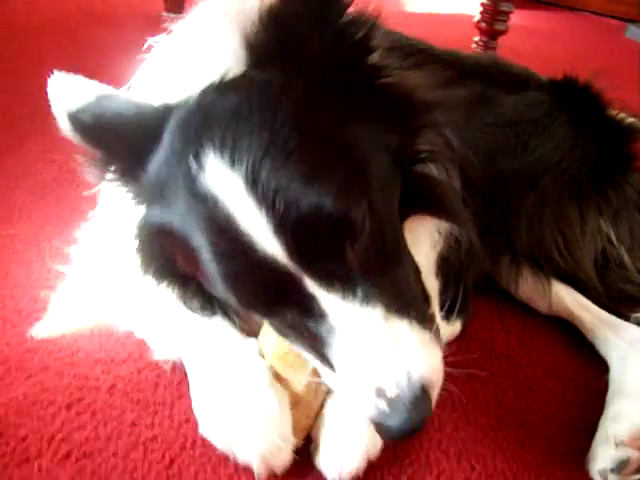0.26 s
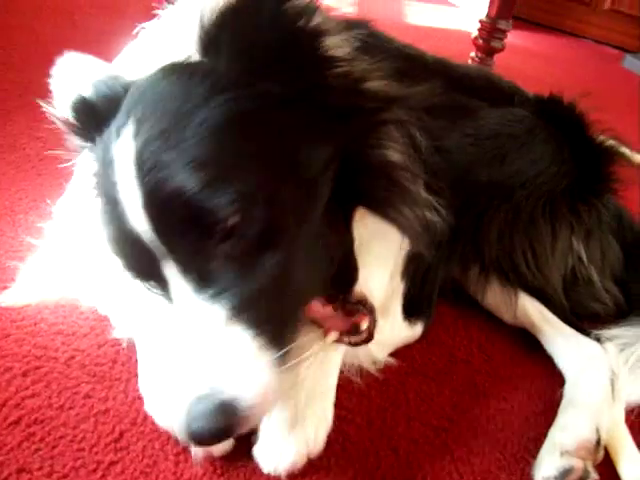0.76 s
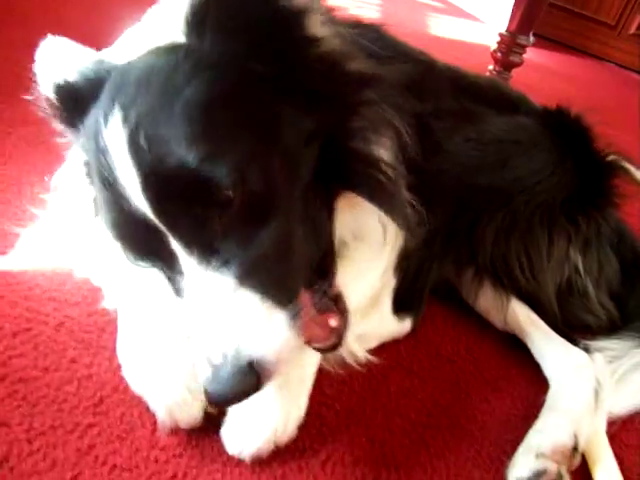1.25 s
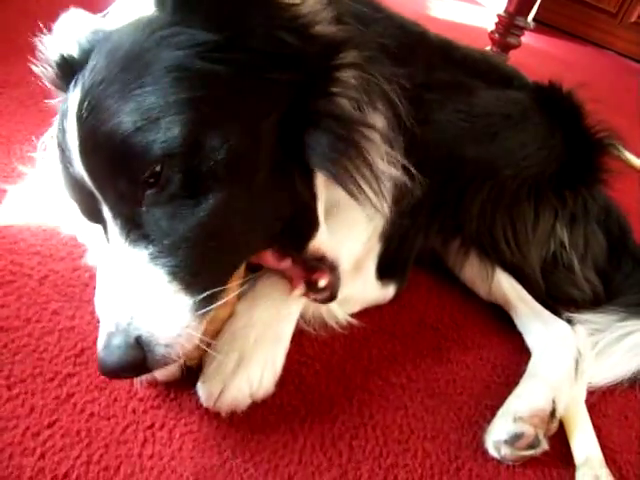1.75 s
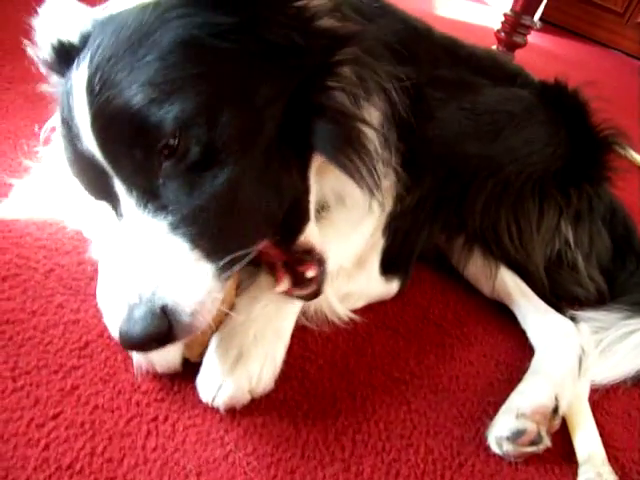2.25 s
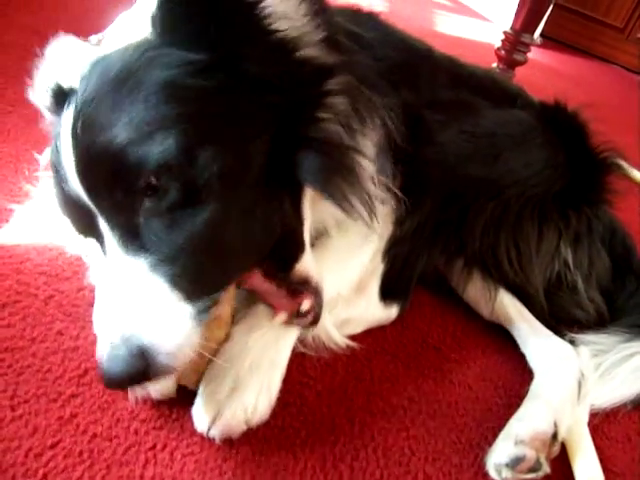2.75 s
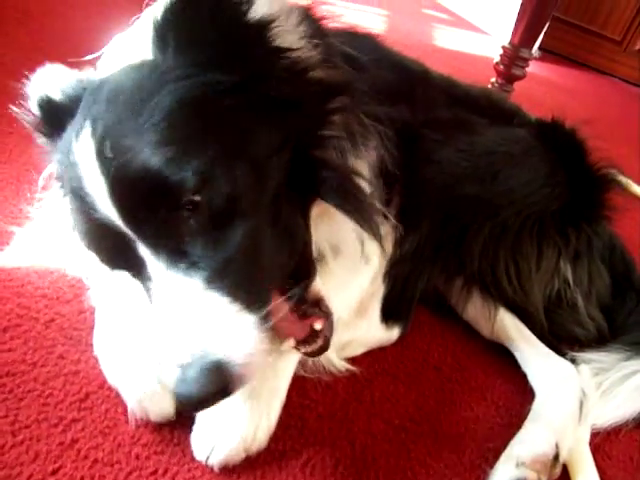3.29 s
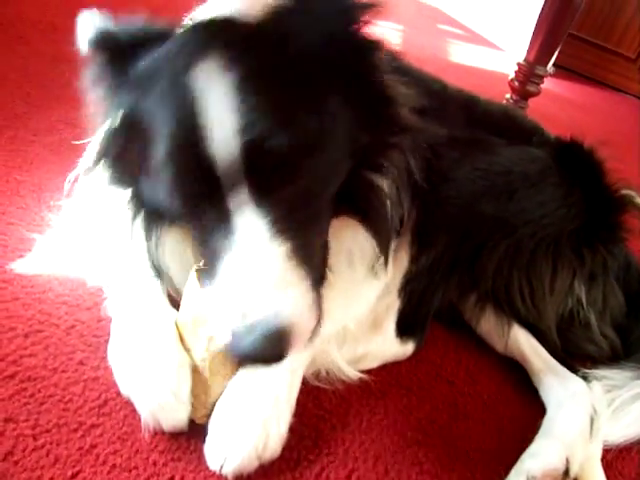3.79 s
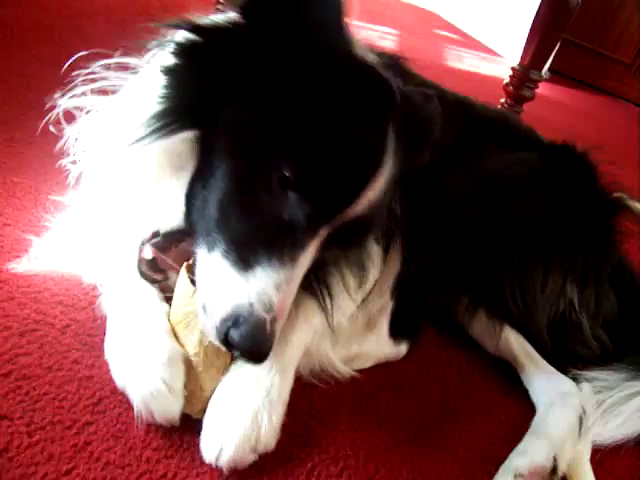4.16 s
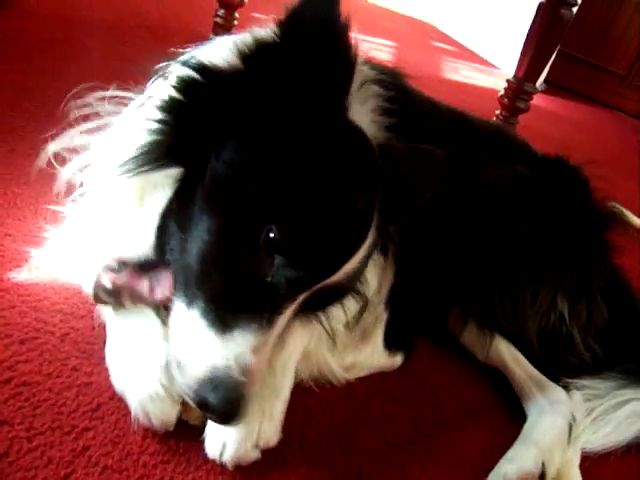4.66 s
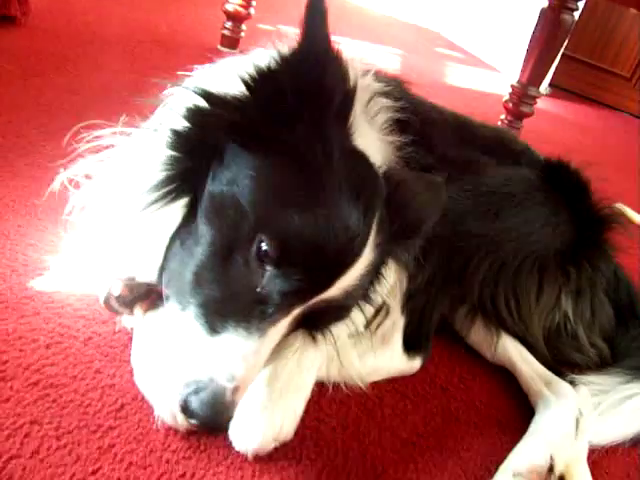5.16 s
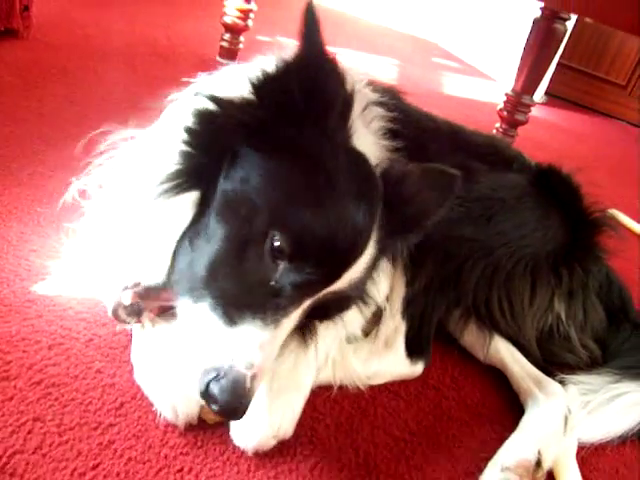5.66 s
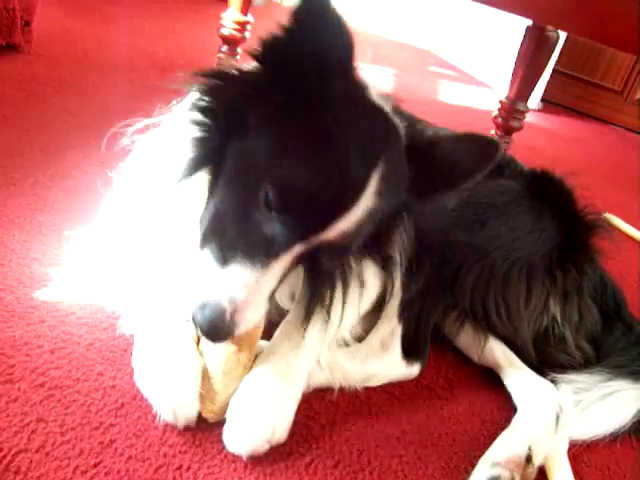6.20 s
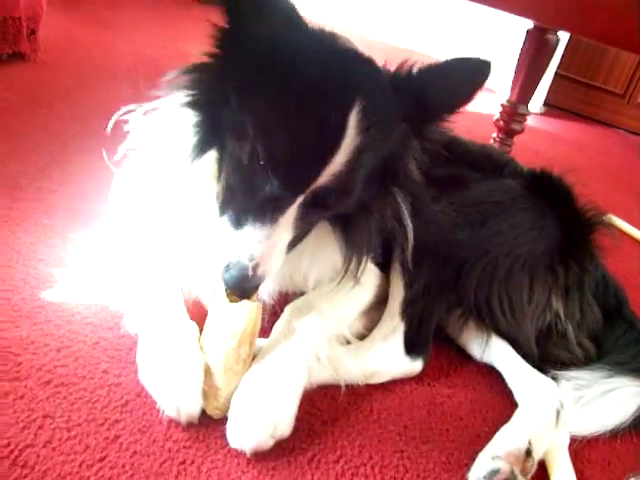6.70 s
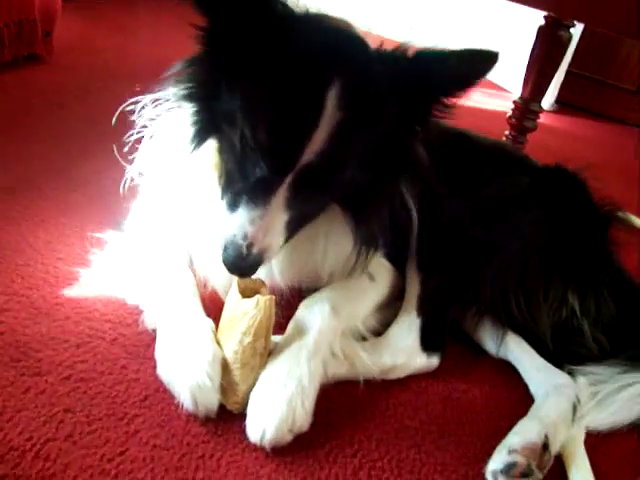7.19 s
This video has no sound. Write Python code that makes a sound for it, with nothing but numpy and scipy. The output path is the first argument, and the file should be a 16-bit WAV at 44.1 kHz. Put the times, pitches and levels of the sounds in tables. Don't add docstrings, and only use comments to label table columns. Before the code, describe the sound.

Close to a small camera in a carpeted room, a dog chews a hard bone. Bright tooth cracks and dull, short hollow knocks come in irregular clusters, with brief scrapes and tiny ticks between. The hardest bites fall around three and a half and five and a half seconds. Then it quiets to hum and hiss, a soft far door thud, a faint wet smack, and one last sharp crack with a damped tag clink.

```python
import sys
import numpy as np
from scipy import signal
from scipy.fft import rfft, irfft
from scipy.io import wavfile
from scipy.ndimage import uniform_filter1d

SR = 44100
rng = np.random.default_rng(int(sys.argv[2]) if len(sys.argv) > 2 else 0)


def put_to_file(sound):
    columns = np.atleast_2d(sound).T
    safe = np.clip(columns, -1, 1)
    whole_steps = np.round(safe * 32767)
    wavfile.write(sys.argv[1], SR, whole_steps.astype(np.int16))


def to_linear_factor(level_db):
    exponent = np.asarray(level_db, float) / 20
    return 10 ** exponent


N = 328104

# start_s, whine_db, hum_db
CAMERA_GAIN = [(0, -73.5, -74.5), (1.8, -76.5, -60), (2.3, -70, -52.5), (3.5, -68, -49.5),
               (5.7, -63.5, -46), (5.9, -75.5, -56), (7.44, -76, -48.5)]
# pitch_hz, level_db
MICROPHONE = [(1500, -1.5), (3300, 2.5), (5300, 1), (6800, 3.5), (7500, 1.5), (8000, -8), (8900, -5.5),
              (9700, -20), (10300, -52)]
# start_s, level_db, ring_share (of the free ring time)
TAG_HITS = [
    (.294, -39, 1),
    (0.326, -36.5, 1),
    (7.402, -24.5, 0.25),
    (7.429, -40, 0.6),
]
HOLLOW_HZ = 750


def evened(x):
    return x / np.sqrt(np.mean(x ** 2) + 1e-20)


def read(points, hz):
    f, value = np.transpose(points)
    return np.interp(np.log(hz + 1), np.log(f + 1), value)


def curve(rows, axis):
    return np.interp(np.arange(N) / SR, *np.transpose(rows)[[0, axis]])


def add(mix, s, sound):
    part = mix[round(s * SR):][:len(sound)]
    part += sound[:len(part)]


def resonate(x, hz, width):
    return signal.lfilter(*signal.iirpeak(hz, hz / width, SR), x)


def colour(x, points):
    log_gain = np.log(to_linear_factor(read(points, abs(np.fft.fftfreq(4096, 1 / SR)))))
    taps = np.fft.ifft(np.exp(np.conj(signal.hilbert(log_gain)))).real[:2048]
    return signal.oaconvolve(x, taps)[:len(x)]


def drift(per_s):
    return evened(signal.lfilter(*signal.butter(2, per_s, fs=SR), rng.standard_normal(N)))


def dying(t60s, levels):
    hz, t, z = signal.stft(rng.standard_normal(SR // 2), SR, nperseg=256)
    fade_db = read(levels, hz)[:, None] - 60 * t / read(t60s, hz)[:, None]
    return signal.istft(z * to_linear_factor(fade_db), SR, nperseg=256)[1]


def cracks():
    # start_s, peak_db, length_ms, body_db
    enamel_snaps = [(.1001, -16, 2.1, -17.5), (.1103, -28.5, 2.6, -24), (.2609, -18.5, 3.2, -13),
                    (.2937, -1, 1.5, -12), (.3711, -39, 1.2, -9.5), (1.0739, -37, 3, -9.5),
                    (1.5412, -35, 2.64, -38), (1.7114, -45.5, .43, -24.5), (2.5506, -39, 3.5, -24),
                    (2.8028, -24.5, 3.1, -15), (3.0122, -13, 0.86, -23.5), (3.0215, -37, 5.6, -12),
                    (3.2663, -14.5, 2.7, -7.5), (3.8568, -35.5, 0.29, -27), (3.9348, -17.5, 1.17, -13.5),
                    (3.9461, -23, 1.5, -19), (3.9687, -25, 1.6, -5), (4.0837, -15, 2.6, -51),
                    (4.094, -31, 3, -32), (4.1015, -35, 1.6, -11), (4.11, -32, 2.9, -15),
                    (5.5431, -19, 3.2, -12), (5.555, -15, 1.3, -12), (5.6854, -6, 1.8, -18),
                    (7.4005, -7, 1.8, -10), (4.5043, -29, 1.5, -2), (3.883, -46, .8, -25)]
    # start_s, peak_db, length_ms
    whole_crunches = [(.194, -18.5, 3), (.2517, -34, 2.2), (.2902, -15, 5), (.3206, -28.5, 2.8),
                      (.6342, -41.5, 3), (.8724, -31, 2.2), (.9043, -38.5, 2.3), (1.139, -35.5, 4),
                      (1.201, -39, 2.6), (1.2089, -25.5, 4.2), (1.261, -43, 8.2), (1.367, -49, 1.5),
                      (1.5198, -31.5, 0.56), (2.0134, -35.5, 2.5), (2.0741, -44, 1), (2.9366, -34, 8.5),
                      (3.2337, -22, 0.98), (3.2776, -43, 4.4), (3.3273, -24, 3.4), (3.3962, -24.5, 6.1),
                      (3.4015, -28, 4.4), (3.4139, -20.5, 2.1), (3.451, -10.5, 1.1), (3.8376, -56, 2.6),
                      (3.9744, -35, 3.8), (3.981, -38.5, 4.5), (3.9894, -41, 3.1), (3.9974, -23, 2.9),
                      (2.632, -50.5, 1.1), (7.4278, -33.5, 3.3)]
    # start_s, peak_db, length_ms, body_db, pitch_hz
    flakes = [(.4578, -37, 2.2, -9, 4150), (.8838, -39, 1.5, -20, 6800), (1.0666, -39.5, 6.5, -12, 3420),
              (1.2641, -37, 1.8, 2.5, 3670), (1.837, -46.5, 1, 6, 2500), (2.0089, -28, 2.3, -4, 3520),
              (2.3958, -38, 2.8, 0.5, 3200), (2.5573, -37, 1.6, -5, 3570), (2.8209, -26.5, 1.2, -20, 3250),
              (2.8839, -30.5, 1.6, -0.5, 3600), (2.9446, -18, 2.2, -1.5, 3380),
              (3.2226, -30.5, 2.5, -9, 4120), (3.4086, -23, 1.3, -18, 3600), (3.4429, -21, 3, -28, 3820),
              (3.642, -27.5, 0.89, -12, 3470), (4.8356, -44, 4, 0, 3350), (4.8557, -26, 0.33, -2.5, 3200),
              (5.282, -19.5, 2.1, -14, 3320), (5.3893, -32.5, 1.167, -10, 3220),
              (5.6723, -23, 4, -14, 3040), (5.6842, -8, 3, -28, 3020), (5.7857, -22.5, 1.4, 1, 3820),
              (6.0279, -43.5, 2.1, -30, 3490), (6.0435, -41, 3, -5, 3430), (6.8992, -46, 4, -25, 2800),
              (2.26, -48.5, 2.5, 0, 2670)]
    # start_s, peak_db, length_ms, body_db
    splinters = [(.2842, -32, 4.4, 4), (.5275, -35, 1.4, -12), (.5363, -44.5, 6.3, -2),
                 (2.0426, -40, 3.9, -24), (2.4671, -22, 1.9, -9), (4.5738, -32, 7.5, -1.5),
                 (4.7381, -33, 3.9, -26), (5.3143, -29.5, 3.4, -6.5), (5.7756, -4, 3.3, -15),
                 (5.7948, -27.5, 6, -3), (5.94, -50, 2.2, -9), (6.1067, -47, 2.7, -15),
                 (6.1188, -43.5, 2.9, -2), (6.1453, -46, 0.56, 1.5), (6.3919, -46, 2.5, -16),
                 (7.3982, -17, 2.8, -7)]
    # pitch_hz, width_hz
    shell_modes = [(2850, 160), (3450, 350), (4550, 450)]
    enamel_hz, splinter_hz, piece_spread = 6700, 4830, 0.03
    enamel_ring, shell_ring = 0.35, 0.55
    t, out = np.arange(900) / SR, np.zeros(N)
    open_air = signal.butter(2, 2600, "high", fs=SR)
    crunches = [(*row, -1.5) for row in whole_crunches]
    kinds = [(enamel_snaps, enamel_hz, enamel_ring), (crunches, enamel_hz, enamel_ring),
             (flakes, None, shell_ring), (splinters, splinter_hz, enamel_ring)]
    for rows, chip_hz, ring_share in kinds:
        noise = rng.standard_normal((30, len(t), 2))
        grip = rng.random((30, len(shell_modes) + 1))
        for (s, db, ms, body_db, *own_hz), z, (piece, *free) in zip(rows, noise, grip):
            hz = own_hz[0] if own_hz else chip_hz * (1 + piece_spread * (2 * piece - 1))
            fade = (1 - np.exp(-t / 0.000096)) * np.exp(-t / (0.0008 * ms))
            uneven = to_linear_factor(11 * uniform_filter1d(z[:, 1], size=9))
            fractures = z[:, 0] * uneven * fade
            shell = sum(share * resonate(fractures, f, width) for share, (f, width) in zip(free, shell_modes))
            bright = evened(signal.lfilter(*open_air, fractures))
            bright = bright + ring_share * evened(resonate(fractures, hz, 350)) + 0.078 * evened(shell)
            bright = colour(bright, MICROPHONE)
            body = resonate(fractures, 1700, 300) + 1.1 * resonate(fractures, 2100, 500)
            body = resonate(body, 1700, 2400)
            crack = bright / abs(bright).max() + to_linear_factor(body_db) * body / abs(body).max()
            add(out, s - .0003, to_linear_factor(db + 1.5) * crack)
    return out


def knocks():
    # start_s, peak_db, pitch_hz
    clamps = [(.0997, -14.5, 675), (.194, -13, 570), (.458, -24.5, 556), (.5376, -31, 653),
              (1.0746, -28.5, 590), (1.139, -21.5, 625), (1.209, -15, 590), (1.5203, -29.5, 728),
              (1.5418, -26, 568), (1.8496, -26, 524), (2.3966, -21, 655), (2.4552, -28, 627),
              (2.4667, -18.5, 564), (2.5475, -36, 446), (2.585, -36, 390), (3.0101, -36, 610),
              (3.094, -29.5, 335), (3.146, -36, 327), (3.2669, -12, 590), (3.3277, -8, 524),
              (3.4509, -3.5, 716), (3.6912, -28.5, 580), (4.8357, -21.5, 513), (4.856, -12.5, 820),
              (4.999, -24, 570), (5.2824, -3.5, 750), (5.3153, -11, 614), (5.5557, -4, 760),
              (5.6708, -19, 590), (5.6882, -6, 490)]
    # start_s, peak_db, pitch_hz
    held_knocks = [(.2606, -20, 840), (.3217, -32, 1120), (.6338, -25.5, 696), (.8724, -19.5, 805),
                   (.8836, -32.5, 630), (6.0503, -36, 848), (1.2016, -26.5, 686), (1.2641, -18, 619),
                   (1.8377, -26.5, 699), (2.0098, -25.5, 692), (2.0136, -28, 510), (2.2661, -31.5, 753),
                   (2.8039, -31.5, 700), (2.821, -28.5, 500), (2.884, -18.5, 548), (2.9451, -13.5, 676),
                   (3.2238, -22.5, 440), (3.2342, -18, 726), (3.401, -16, 680), (3.4132, -10, 543),
                   (3.6426, -20.5, 480), (3.935, -28, 630), (3.9972, -24.5, 815), (6.1206, -39.5, 810),
                   (4.5044, -22, 837), (4.5745, -8.5, 658), (4.8465, -21.5, 660), (5.2703, -26, 870),
                   (5.5435, -15, 970), (5.7844, -9, 800)]
    # start_s, peak_db, pitch_hz
    slips_free = [(.251, -24, 600), (.2675, -24, 468), (.292, -9.5, 1070), (.3002, -22, 1100),
                  (3.938, -38, 870), (2.9345, -24, 665), (3.4088, -15, 470), (3.989, -38, 880),
                  (3.969, -35, 880), (3.981, -34, 880), (5.3018, -27, 526), (5.323, -24.5, 500),
                  (5.389, -30, 714), (5.431, -33, 450), (5.6756, -17.5, 590), (5.682, -14.5, 793),
                  (5.7793, -20, 590), (5.293, -30, 560), (3.345, -33, 600), (7.4022, -16, 1183),
                  (7.4008, -32, 680), (4.084, -35.5, 540), (4.5046, -25, 1400), (4.521, -35, 1290),
                  (1.367, -42.5, 595)]
    # pitch_hz, level_db
    jaw_colour = [(60, -11), (180, -5), (260, 4), (400, 0.5), (950, 0), (1200, -6.5), (2500, -8)]
    t, out = np.arange(3000) / SR, np.zeros(N)
    kinds = (clamps, 0.0046), (held_knocks, 0.008), (slips_free, 0.016)
    for blows, middling_s in kinds:
        for (s, db, hz), (a, b) in zip(blows, rng.random((30, 2))):
            t60 = middling_s * (1.5 - 0.0055 * (db + 18.5))
            fade = to_linear_factor(-60 * t / (0.79 * t60)) * (1 - np.exp(-t / 0.0027))
            lower_share = (0.39 + .5 * b) * min(1, (HOLLOW_HZ / hz) ** 2)
            lower = lower_share * np.sin(2 * np.pi * hz * (.55 + 0.37 * a) * t)
            ring = np.sin(2 * np.pi * hz * 1.122 * t) + lower
            push = 0.052 * np.sin(2 * np.pi * 190 * t) * to_linear_factor(-60 * t / 0.01)
            blow = -fade * ring - push
            add(out, s - .0004, to_linear_factor(db) * blow / abs(blow).max())
    return colour(out, jaw_colour)


def ticks():
    # start_s, peak_db, pitch_hz
    low_ticks = [(0.2511, -15, 620), (0.2851, -27, 470), (0.2932, -13, 1170), (0.2964, -18, 1160),
                 (0.3009, -24, 1280), (0.3226, -32, 1130), (0.3273, -36, 1250), (0.5292, -37, 550),
                 (0.6718, -38, 520), (0.9049, -34, 540), (1.0665, -39, 560), (1.2136, -30, 380),
                 (1.2869, -33, 410), (1.861, -36, 460), (2.0736, -39, 200), (2.5304, -38, 360),
                 (2.9482, -21, 360), (2.9622, -29, 780), (2.9751, -34, 400), (3.0017, -31, 740),
                 (3.0126, -27, 730), (3.0157, -28, 520), (3.0194, -35, 520), (3.0306, -36, 320),
                 (3.2699, -21, 900), (3.2729, -26, 300), (3.2756, -27, 200), (3.334, -26, 200),
                 (3.3559, -30, 390), (3.3985, -19, 940), (3.4202, -25, 780), (3.4346, -29, 240),
                 (3.4375, -29, 200), (3.4404, -31, 250), (3.9381, -33, 550), (3.9462, -32, 900),
                 (4.593, -31, 720), (4.6056, -35, 780), (5.0085, -35, 250), (5.4431, -34, 450),
                 (5.6649, -38, 240), (5.7129, -32, 530), (5.776, -13, 450), (5.7787, -13, 430),
                 (5.7944, -23, 860)]
    # start_s, peak_db, pitch_hz
    middle_ticks = [(0.2095, -42, 1500), (0.214, -40, 1510), (0.2485, -40, 1690), (0.2565, -42, 1590),
                    (0.2614, -31, 1660), (0.3196, -34, 1510), (2.0089, -34, 2190), (2.8316, -46, 1610),
                    (2.9344, -41, 2200), (2.9537, -44, 2310), (2.9591, -43, 1520), (2.97, -42, 2490),
                    (3.2858, -44, 1590), (3.3421, -42, 1450), (3.3459, -42, 1560), (3.4679, -44, 1590),
                    (3.4719, -46, 1300), (3.943, -44, 2060), (3.9603, -44, 1680), (4.8455, -42, 2520),
                    (4.8723, -45, 1340), (5.3228, -46, 1300), (5.5716, -41, 1300), (5.5772, -46, 1300),
                    (5.5799, -43, 1400), (5.6761, -32, 2520), (5.7918, -34, 1460), (5.806, -43, 2390),
                    (5.813, -43, 1390), (5.8192, -45, 2520), (6.1209, -43, 1630)]
    # start_s, peak_db, pitch_hz
    high_ticks = [(0.1191, -41, 6320), (0.1846, -40, 3680), (0.2046, -38, 6830), (0.2126, -43, 2910),
                  (0.2546, -37, 6100), (0.2576, -39, 6940), (0.2753, -44, 6130), (2.0738, -41, 7030),
                  (2.9192, -44, 5060), (2.958, -38, 6790), (2.9641, -42, 5800), (3.244, -43, 3240),
                  (3.2894, -41, 7010), (3.3198, -43, 7010), (3.3545, -40, 6850), (3.3989, -28, 6550),
                  (3.4615, -42, 6840), (3.8372, -43, 6430), (3.9409, -40, 2620), (4.1054, -41, 6420),
                  (4.5148, -43, 6820), (4.5767, -36, 6760), (4.6758, -43, 5300), (4.8304, -42, 3190),
                  (4.8452, -38, 2610), (4.8487, -41, 6780), (4.8612, -40, 6300), (4.9936, -42, 5760),
                  (5.0087, -43, 3150), (5.0249, -41, 5880), (5.0276, -42, 7030), (5.0979, -44, 3710),
                  (5.2696, -42, 2980), (5.3214, -41, 3310), (5.3716, -42, 3550), (5.3767, -40, 3390),
                  (5.721, -43, 2940), (7.4114, -40, 3490)]
    t, out = np.arange(900) / SR, np.zeros(N)
    for rows, cycles in (low_ticks, 2.8), (middle_ticks, 5.5), (high_ticks, 12):
        for s, db, hz in rows:
            fade = to_linear_factor(-60 * t * hz / cycles) * (1 - np.exp(-t * hz * 1.3))
            tick = -fade * np.sin(2 * np.pi * hz * t)
            soft_db = 2.5 * min(np.log2(hz / HOLLOW_HZ), 0)
            add(out, s, to_linear_factor(db + soft_db) * tick / abs(tick).max())
    return out


def grind():
    # start_s, length_s, scrape_db, mush_db
    drags = [(0.036, 0.057, -64, -68), (0.086, 0.19, -55, -54.5), (0.245, 0.036, -58, -40),
             (0.464, 0.03, -87, -55.5), (0.632, 0.06, -76, -53), (0.722, 0.049, -67.5, -88),
             (0.969, 0.059, -66, -63), (0.885, 0.046, -73.5, -59), (1.192, 0.097, -57, -55),
             (1.53, 0.028, -68, -61), (1.914, 0.15, -60, -57.5), (2.446, 0.058, -59, -49.5),
             (2.527, 0.065, -57.5, -55), (2.812, 0.038, -66, -59.5), (2.908, 0.128, -49.5, -53.5),
             (3.228, 0.14, -56.5, -51), (3.392, 0.036, -43, -32.5), (3.79, 0.046, -64, -109),
             (3.945, .06, -57, -52.5), (4.801, 0.077, -52.5, -71), (5.065, 0.04, -60.5, -77),
             (5.263, 0.14, -62, -55), (5.668, 0.03, -47.5, -25), (6.022, 0.12, -98, -66),
             (6.463, 0.064, -69.5, -75)]
    # start_s, level_db
    effort = [(0, -56.5), (.4, -70.5), (.85, -69.5), (1.2, -49.5), (1.7, -87.5), (2.3, -106), (2.7, -58),
              (3.3, -45.5), (3.6, -65), (4.3, -70), (4.9, -48), (5.7, -54), (5.84, -60), (5.95, -77.5)]
    # pitch_hz, width_hz, level_db
    mouth_modes = [(274, 29, -9.5), (590, 220, 7), (879.6, 200, -0.5), (1650, 260, -18)]
    slips = rng.standard_normal((2, N)) * to_linear_factor(2.4 * np.minimum(rng.exponential(1, (2, N)), 4))
    slips *= rng.random((2, N)) < np.array([[14000], [1500]]) / SR
    scrape = colour(signal.lfilter(*signal.butter(2, 2000, "high", fs=SR), slips[0]), MICROPHONE)
    mush = np.zeros(N)
    for hz, width, db in mouth_modes:
        mush += to_linear_factor(db) * resonate(resonate(slips[1], hz, 2 * width), hz, 2 * width)
    effort_db = curve(effort, axis=1)
    bright = to_linear_factor(curve(CAMERA_GAIN, axis=1) + 6 + 0.059 * (effort_db - effort_db[0]))
    dull = to_linear_factor(effort_db - 10.5)
    for s, length, scrape_db, mush_db in drags:
        stroke = np.sin(np.pi * np.linspace(0, 1, round(1.32 * length * SR)) ** 0.78)
        add(bright, s, to_linear_factor(scrape_db) * stroke)
        add(dull, s, to_linear_factor(mush_db) * stroke)
    clumps = to_linear_factor(1.8 * drift(50))
    return clumps * (bright * evened(scrape) + dull * evened(mush))


def buzz():
    # start_s, level_db, pitch_hz, width_hz, t60_s
    rattles = [(5.69, -48, 2900, 220, .25), (5.69, -46, 7100, 300, .18), (5.69, -46, 2000, 1400, .15),
               (5.79, -48, 5950, 300, .25), (5.785, -42, 2800, 1800, .16), (5.79, -45, 1410, 400, .12),
               (3.27, -43, 1700, 900, .1), (3.33, -44, 1600, 900, .12), (3.455, -42, 1800, 900, .1),
               (7.4008, -21, 3880, 150, .022), (7.405, -38, 3500, 150, .06), (2.95, -46, 2200, 900, .12),
               (3.936, -46, 990, 120, .35), (5.56, -43, 1400, 500, .1), (7.4285, -41, 3500, 150, .04)]
    t, out = np.arange(9000) / SR, np.zeros(N)
    for (s, db, hz, width, t60), z in zip(rattles, rng.standard_normal((20, len(t)))):
        ring = evened(resonate(resonate(z, hz, 2 * width), hz, 2 * width))
        add(out, s, to_linear_factor(db - 60 * t / t60) * (1 - np.exp(-t / .0015)) * ring)
    return out


def smacks():
    # start_s, peak_db, pitch_hz, t60_s
    bubbles = [
        (6.737, -57, 900, .01),
        (6.745, -52, 850, .022),
        (6.834, -51, 950, .014),
        (6.844, -50, 520, .015),
        (6.863, -42.5, 1050, .032),
        (6.864, -48, 1450, .018),
    ]
    rise, rise_s, rough = .33, .002, .8
    t, out = np.arange(2000) / SR, np.zeros(N)
    climb = np.cumsum(1 + rise * (1 - np.exp(-t / rise_s))) / SR
    for (s, db, hz, t60), z in zip(bubbles, rng.standard_normal((10, len(t)))):
        ragged = 1 + rough * evened(uniform_filter1d(z, size=70))
        fade = to_linear_factor(db + 3.5 - 60 * t / t60) * (1 - np.exp(-t / .0008))
        add(out, s, fade * ragged * np.sin(2 * np.pi * hz * climb))
    return out


def tag():
    # pitch_hz, level_db, t60_s
    metal_modes = [(1278, -12, .35), (1529, 0, .45), (1572, -10, .08), (2775, -20, .15), (3480, -16, .06)]
    t, out = np.arange(SR // 2) / SR, np.zeros(N)
    for s, hit_db, share in TAG_HITS:
        for k, (hz, db, t60) in enumerate(metal_modes):
            fade = to_linear_factor(hit_db + db - 60 * t / (t60 * share))
            add(out, s, (-1) ** k * fade * np.sin(2 * np.pi * hz * t))
    return out


def room(x):
    # pitch_hz, t60_s
    echo_times = [(150, 0.41), (600, 0.21), (1200, 0.21), (3000, .13), (7000, 0.25)]
    # pitch_hz, level_db
    reflected = [(200, -16.5), (700, -11), (1400, -16), (2300, -28.5), (2900, -26.5), (3800, -36),
                 (6200, -33.5), (7000, -23), (8000, -34.5)]
    tail = dying(echo_times, reflected) / 25
    swell = np.minimum(np.arange(len(tail)) / (.008 * SR), 1)
    return signal.fftconvolve(x, tail * swell)[:N]


def thump():
    # (pitch_hz, t60_s)
    far_door = (6.5, -27.5, [(60, 0.86), (200, 0.58), (450, 0.14), (900, 0.087), (1500, 0.035)])
    s, db, t60s = far_door
    thud = dying(t60s, [(60, -5.5), (150, -5.0), (800, -1.5), (1400, -43), (5000, -46)])
    swell = np.minimum(np.arange(len(thud)) / (0.0031 * SR), 1)
    out = np.zeros(N)
    add(out, s, to_linear_factor(db) * thud / abs(thud).max() * swell)
    return out


def background():
    # pitch_hz, level_db (per Hz)
    air_colour = [(6, -6), (24, -0.5), (38, -10.5), (65, -15.5), (150, -21), (260, -23.5), (420, -30.5),
                  (1420, -41), (3440, -47.5), (6000, -43.5), (10300, -73.5)]
    hum_hz, whine_hz, air_db = 48.4, 5821, -51
    t, whine_db = np.arange(N) / SR, curve(CAMERA_GAIN, axis=1)
    spectrum = rfft(rng.standard_normal(N)) * to_linear_factor(read(air_colour, np.fft.rfftfreq(N, 1 / SR)))
    air = to_linear_factor(air_db + 0.79 * (whine_db - whine_db[-1])) * evened(irfft(spectrum, N))
    unsteady = resonate(resonate(rng.standard_normal(N), hum_hz, 6), hum_hz, 6)
    motor = np.sin(2 * np.pi * hum_hz * t) + .2 * evened(unsteady)
    whine_level = to_linear_factor(whine_db + 3.0 + 1.5 * drift(40))
    whine = whine_level * np.sin(2 * np.pi * whine_hz * t + 0.37 * drift(30))
    return air + to_linear_factor(curve(CAMERA_GAIN, axis=2) + 4.0) * motor + whine


def scene():
    blows, snaps = knocks() + ticks(), cracks()
    coupled = np.ones(N)
    for s, *_ in TAG_HITS:
        coupled[round((s - .005) * SR):round((s + .012) * SR)] = .3
    dog = blows + snaps + tag() + grind() + buzz() + smacks()
    echoes = room(blows + coupled * snaps)
    return (dog + echoes + thump() + background())[None]


def low_pass(x):
    return signal.sosfilt(signal.butter(12, 10470, fs=SR, output="sos"), x)


def record(dry):
    edge = signal.butter(12, 9750, fs=SR, output="sos")
    mix = np.clip(signal.sosfilt(edge, dry), -1, 1)
    return low_pass(mix)


dry = scene()
out = record(dry)
put_to_file(out)
```